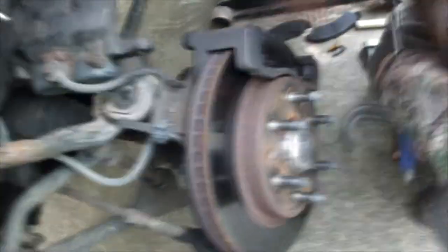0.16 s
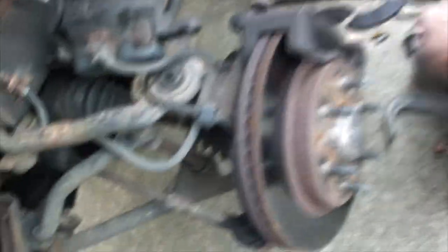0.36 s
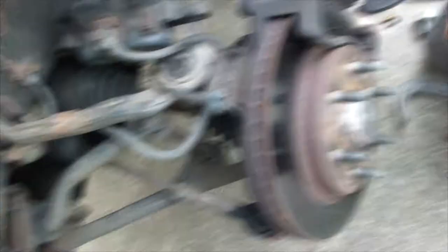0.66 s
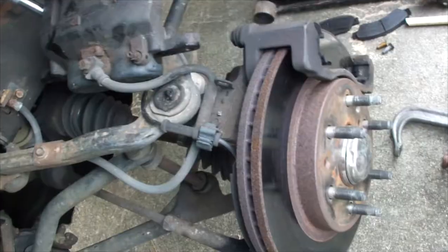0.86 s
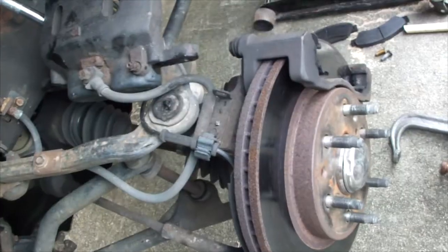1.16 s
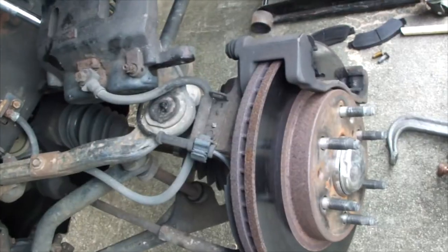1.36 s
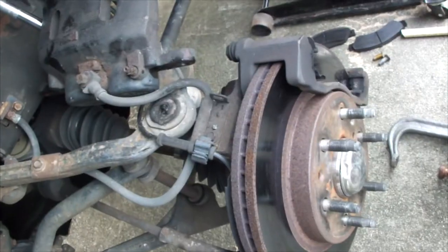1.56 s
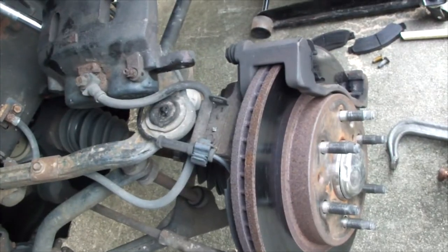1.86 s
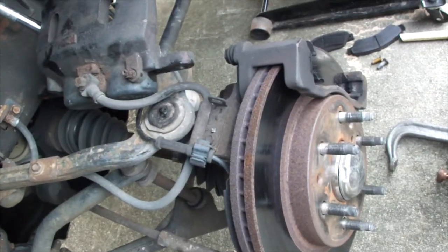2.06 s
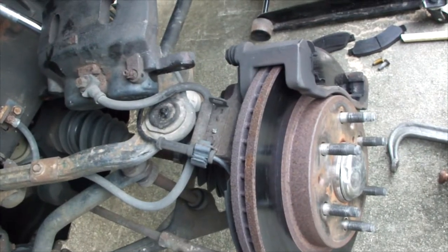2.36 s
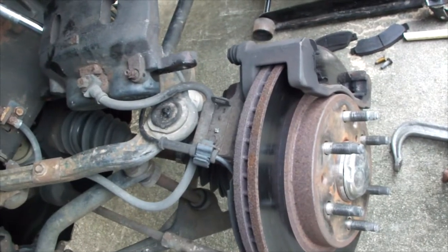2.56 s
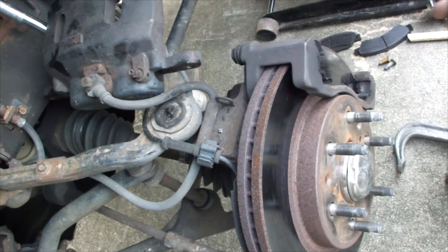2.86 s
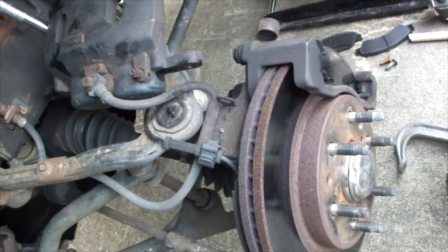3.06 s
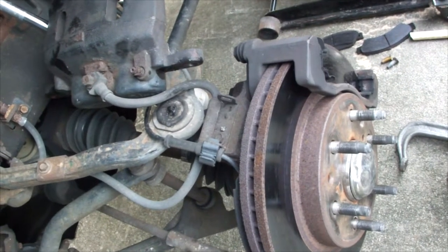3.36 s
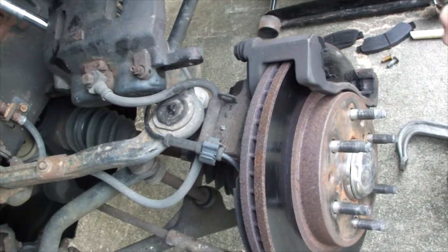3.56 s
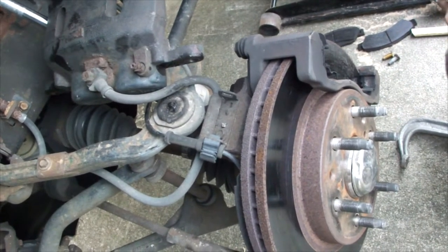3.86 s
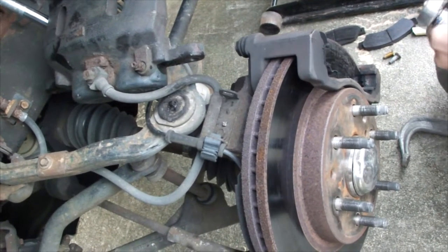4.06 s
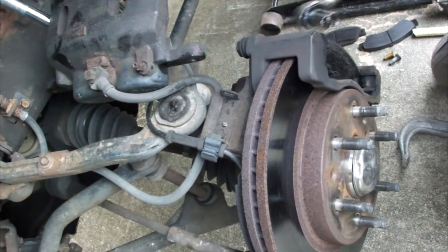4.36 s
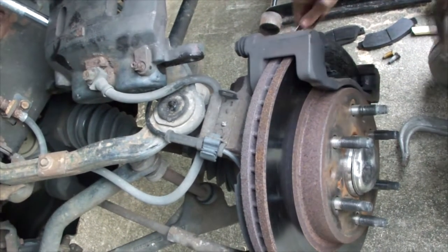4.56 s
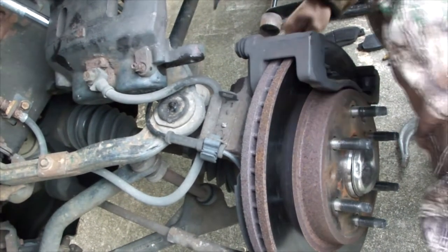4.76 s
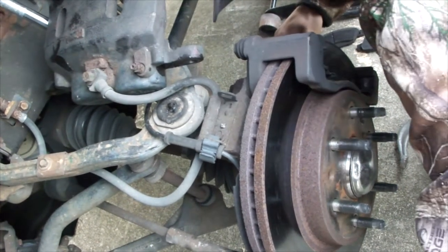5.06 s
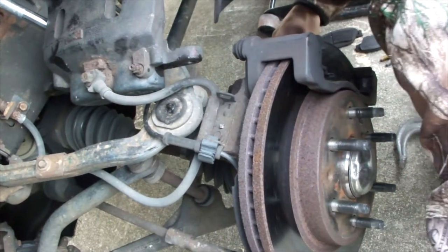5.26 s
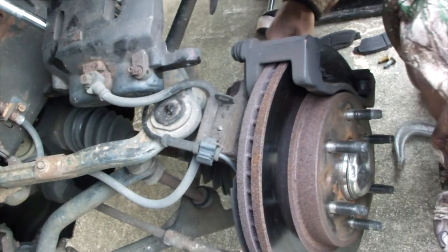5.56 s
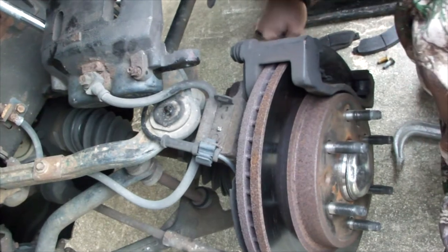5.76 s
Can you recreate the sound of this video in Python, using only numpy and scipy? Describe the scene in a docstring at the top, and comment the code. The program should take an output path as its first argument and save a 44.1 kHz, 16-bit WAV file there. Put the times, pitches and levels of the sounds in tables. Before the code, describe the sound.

Close metallic clinks and four quick ratchet rasps over low traffic wash, with faint bird calls and a hard steel knock near the end.

```python
"""Low traffic wash and airy hiss from beyond an open garage, then close by a tool is put down: the front brake of a
car is being worked on. Wrench and socket clink, and a ratchet swings back four times, its pawl rasping over the
teeth. Steel meets the caliper in a soft thump, then two knocks; a few far birds call. Steel contacts are short noise
bursts through resonances, knocks add decaying modes, birds are gliding sines, the background is coloured noise.
The garage adds a diffuse echo; the overall tone has a scooped presence and very little around 13 kHz."""
import sys
import numpy as np
from scipy import signal
from scipy.fft import rfft, irfft
from scipy.io import wavfile

SR = 44100
rng = np.random.default_rng(int(sys.argv[2]) if len(sys.argv) > 2 else 0)


def digitize_waveform(pressure):
    """Quantize a signal to 16-bit integers and store it at the path in sys.argv[1].

    Rows of a 2-D input are taken as channels; values are limited to [-1, 1].
    """
    field = np.atleast_2d(pressure).T
    bounded = np.clip(field, -1, 1)
    quanta = np.round(bounded * 32767).astype(np.int16)
    wavfile.write(sys.argv[1], SR, quanta)


N = 261072


def from_db(db):
    """Level in dB to amplitude factor."""
    return 10 ** (np.asarray(db) / 20)


def dying(t, t60):
    """Exponential decay that falls 60 dB in t60 seconds."""
    return from_db(-60 * t / t60)


def add(track, s, sound):
    """Mix a sound into a track at a given second."""
    at = max(int(s * SR), 0)
    part = sound[..., :N - at]
    track[..., at:at + part.shape[-1]] += part


def colour(x, points, size=16384):
    """Causal (minimum-phase) filter through (hz, db) points, built by folding the cepstrum."""
    hz, db = np.transpose(points)
    bin_hz = np.fft.rfftfreq(size, 1 / SR)
    gain_db = np.interp(np.log(bin_hz + 1), np.log(hz), db)
    cepstrum = irfft(np.log(from_db(gain_db)))[:size // 2]
    cepstrum[1:] *= 2
    response = irfft(np.exp(rfft(cepstrum, size)))[:size // 4]
    return signal.oaconvolve(x, np.array(response, ndmin=x.ndim), axes=-1)[..., :N]


def band(x, low_hz, high_hz):
    """Keep what lies between two frequencies."""
    edges_hz = [low_hz, min(high_hz, SR / 2 - 1)]
    return signal.sosfilt(signal.butter(2, edges_hz, "band", fs=SR, output="sos"), x + 1e-18)


def resonance(x, hz, width_hz):
    """Ringing of one mode: the narrower, the longer it rings."""
    return signal.lfilter(*signal.iirpeak(hz, hz / width_hz, fs=SR), x + 1e-18)


def widen(pair, width):
    """Mid and side to left and right, the side coloured by a width curve."""
    side = colour(pair[1], width)
    return np.array([pair[0] + side, pair[0] - side])


def outdoors():
    """Low wash of far traffic under an airy hiss; both swell together and step up early on. Sleeves add to the hiss."""
    # spectrum of the far traffic: hz, level_db
    traffic_colour = [(25, -28), (60, -21.5), (120, -3), (190, -1), (350, -1.5), (720, -1.5), (1200, -10),
                      (2500, -25), (8000, -53.5)]
    # spectrum of the hiss and the sleeves: hz, level_db
    air_colour = [(100, -13.5), (500, 0), (1200, 4), (2200, 1.5), (3300, -10.5), (6200, -11), (10000, -15),
                  (15000, -27.5)]
    # slow swell of the background: time_s, level_db
    swell_points = [(.8, 3), (1.05, .5), (1.5, 1.5), (2.4, -0.5), (3.4, 0), (4.25, 1.5), (4.7, -1),
                    (5.4, -0.5), (5.9, 2)]
    # sleeves rustling as the arms move: middle_s, spread_s (standard deviation of the bell shape), level_db
    rustles = [(2.38, 0.14, -55), (3.93, 0.15, -50.5), (4.236, .13, -46), (5.0, .12, -56),
               (5.76, 0.066, -59)]
    # side against mid for far sound: hz, level_db
    far_width = [(60, -18), (150, -10), (400, -4), (1300, -2), (6000, -3), (15000, 1.5)]
    traffic_db, air_db = -39, -53.5
    step_s, step_rise_s, before_step_db = .81, .015, -9.5

    t = np.arange(N) / SR
    before_step = np.clip((step_s - t) / step_rise_s + .5, 0, 1)
    swell = from_db(np.interp(t, *np.transpose(swell_points)) + before_step_db * before_step)
    rustle = 0
    for middle_s, spread_s, db in rustles:
        rustle = rustle + from_db(db) * np.exp(-.5 * ((t - middle_s) / spread_s) ** 2)
    traffic = from_db(traffic_db) * swell * colour(rng.standard_normal((2, N)), traffic_colour)
    air_level = np.hypot(from_db(air_db) * swell, rustle)
    air = air_level * colour(rng.standard_normal((2, N)), air_colour)
    return widen(traffic + air, far_width)


def chatter(hold_s, fall_t60, tail_db, tail_t60, grain_db=9.5):
    """Steel on steel, as mid and side: a few ms of uneven rebounds, then a weaker scatter off the parts nearby."""
    t = np.arange(SR // 8) / SR
    after = np.maximum(t - hold_s, 0)
    shape = np.hypot(dying(after, fall_t60), from_db(tail_db) * dying(after, tail_t60))
    attack = 1 - np.exp(-t / 0.00084)
    grains = from_db(grain_db * np.clip(rng.standard_normal(len(t)), -2, 2))
    grains /= np.sqrt(np.mean(grains ** 2))
    return rng.standard_normal((2, len(t))) * grains * shape * attack


def knocks(blows, modes, punch, rattle_db, ring_db):
    """Each blow is one push, a rattle around the pitch of the contact, a sharp tick and the struck body's modes."""
    # spectrum of all knocks: hz, level_db
    knock_colour = [(30, -30), (100, -15), (220, -1), (2500, 2), (7000, -1), (10500, -5.5), (14000, -30)]
    out, t = np.zeros((2, N)), np.arange(SR // 3) / SR
    quarter_turn = [[0], [np.pi / 2]]   # side against mid
    for s, db, contact_hz, t60, tick_db in blows:
        force = from_db(rattle_db) * rng.standard_normal((2, len(t))) * dying(t, t60)
        force[0, 0] += punch
        sound = band(force, contact_hz / 1.6, contact_hz * 1.3)
        for k, (hz, mode_db, mode_t60) in enumerate(modes):
            softness = 1 / (1 + (hz / contact_hz / 2) ** 2)   # a dull contact hardly wakes the high modes
            level = from_db(ring_db + mode_db + rng.normal(0, 2.2, (2, 1)))
            strength = (-1) ** k * softness * level
            sound = sound + strength * np.sin(2 * np.pi * hz * t + quarter_turn) * dying(t, mode_t60)
        tick = from_db(tick_db) * chatter(hold_s=0.0015, fall_t60=0.019, tail_db=-6.5, tail_t60=0.066)
        add(out, s, from_db(db) * sound)
        add(out, s, from_db(db) * tick)
    return colour(out, knock_colour)


def tool_put_down():
    """A tool lands in a quick run of contacts that ring its modes."""
    # contacts: start_s, level_db, contact_hz, rattle_t60_s, tick_db
    blows = [(0.082, -39, 900, 0.094, -12), (0.090, -26.5, 1850, 0.096, -16), (0.101, -21, 624, 0.067, -15),
             (0.106, -11.5, 1920, 0.039, -16.5)]
    # modes of the struck body: pitch_hz, level_db, t60_s
    modes = [(190, -30, .12), (300, -27, .1), (495, -24, .12), (630, -26, .1), (750, -26, .1),
             (890, -30, .15), (1390, -11, .08), (1560, -14, .07), (1830, -21, .12), (2385, -17, .045),
             (3200, -17, .03)]
    return knocks(blows, modes, punch=7.0, rattle_db=2.5, ring_db=-4.5)


def whistle(length_s, bend, trill_hz, waver=0.012, flutter_db=3.5):
    """One call: the pitch arcs through start, middle and end under a trill, fluttering in pitch and strength."""
    trill_rate_hz, fade_s = 23.06, .014
    t = np.arange(0, length_s, 1 / SR)
    knots = np.linspace(0, length_s, 24)
    wobble, flutter = (np.interp(t, knots, rng.standard_normal(len(knots))) for _ in range(2))
    arc_hz = np.polyval(np.polyfit([0, .5, 1], bend, 2), t / length_s)
    hz = arc_hz + trill_hz * np.sin(2 * np.pi * trill_rate_hz * t)
    phase = 2 * np.pi * np.cumsum(hz * (1 + waver * wobble)) / SR
    fade = np.clip(np.minimum(t, length_s - t) / fade_s, 0, 1)
    return fade * from_db(flutter_db * flutter) * np.sin(phase)


def birds():
    """Far birds: gliding whistles, some trilled, and a few level coos."""
    # whistles: start_s, length_s, start_hz, middle_hz, end_hz, trill_depth_hz, level_db
    calls = [(2.30, .13, 2500, 2800, 2450, 0, -64.5), (4.88, .185, 2400, 2580, 2400, 160.5, -54),
             (5.06, .115, 2650, 2280, 2050, 29, -58), (5.02, .075, 7200, 6700, 8000, 0, -62.5),
             (5.295, .105, 2780, 2240, 2650, 21, -58)]
    # coos: start_s, length_s, pitch_hz, level_db
    coos = [(.27, 0.073, 1072, -59), (0.348, 0.23, 354.5, -62), (0.718, .08, 328.5, -56.5)]
    out = np.zeros(N)
    for s, length_s, start_hz, middle_hz, end_hz, trill_hz, db in calls:
        add(out, s, from_db(db) * whistle(length_s, [start_hz, middle_hz, end_hz], trill_hz))
    for s, length_s, hz, db in coos:
        add(out, s, from_db(db) * whistle(length_s, [hz, hz, hz], 0))
    return out


def steel_body(contacts, direct_colour, modes):
    """Contacts are heard directly and through the ringing of the part."""
    ringing = sum(from_db(db) * resonance(contacts, hz, width_hz) for hz, width_hz, db in modes)
    return colour(contacts, direct_colour) + ringing


def clinks():
    """Loose play of the socket: each touch has its own ring and amount of treble; some graze first."""
    # light clinks of wrench and socket: start_s, level_db, treble_db, ring_hz, grazes (count before the touch)
    touches = [(1.082, -53, -2, 2000, 0), (1.185, -38, -32, 2170, 0), (1.598, -22.5, -5, 1480, 0),
               (1.727, -33.5, -28, 1470, 0), (1.762, -31.5, -18.5, 1750, 1), (1.779, -32, -11, 1900, 0),
               (2.259, -34, 2.5, 2240, 1), (2.559, -32.5, 2.5, 1880, 2), (2.719, -36.5, -1, 1820, 0),
               (2.791, -33.5, -18, 1920, 0), (3.070, -38, -15.5, 1630, 0), (3.086, -42, -17, 1510, 1),
               (3.098, -39.5, 12, 1900, 0), (3.572, -41, -3.5, 1840, 0), (3.585, -34, .5, 1770, 0),
               (3.776, -27, -10, 1325, 0), (4.045, -35.5, 1, 1860, 0), (4.123, -36, -1.5, 1850, 0),
               (4.297, -48.5, 4, 1810, 0), (5.640, -43, -9.5, 1570, 0), (5.772, -45.5, -14, 1980, 0),
               (5.840, -46, -4, 1820, 0)]
    # spectrum of the direct contact: hz, level_db
    socket_colour = [(100, -24.5), (800, -23), (1500, 2.5), (2400, -2), (6500, -4), (10000, -8.5),
                     (15000, -13.5)]
    # resonances of the socket: pitch_hz, width_hz, level_db
    socket_modes = [(2400, 230, 3.5), (3530, 59, 0.5), (6460, 67, 0), (6568, 41, -12.5), (9030, 160, -6.5)]
    graze_s, graze_loss_db = 0.0043, 5   # spacing as a part slides home; each earlier graze is softer by this
    treble_split = signal.butter(1, 2600, fs=SR, output="sos")

    contacts, rings = np.zeros((2, 2, N))
    for s, db, treble_db, hz, grazes in touches:
        for early in range(round(grazes) + 1):
            when = s - early * graze_s
            force = from_db(db - early * graze_loss_db)
            touch = force * chatter(hold_s=0.0043, fall_t60=0.035, tail_db=-6.5, tail_t60=0.075)
            dull = signal.sosfilt(treble_split, touch)
            add(contacts, when, dull + from_db(treble_db) * (touch - dull))
            add(rings, when, resonance(touch, hz, width_hz=126))
    return steel_body(contacts, socket_colour, socket_modes) + from_db(9.0) * rings


def tooth_gaps(count, start_drag, end_drag, braking_teeth):
    """Relative spacing of the teeth, near 1 at full speed: the hand speeds up, runs evenly, then brakes."""
    speed_up_teeth = 2
    k = np.arange(count - 1)
    speeding_up = start_drag * np.exp(-k / speed_up_teeth)
    braking = end_drag * np.exp(-k[::-1] / braking_teeth)
    return 1 + speeding_up + braking


def pawl():
    """The pawl snaps once per tooth, with uneven force; the handle's speed sets spacing and strength."""
    # pushes of the handle (the first swing takes two): start_s, end_s, teeth (count),
    # start_drag and end_drag (extra spacing of first and last teeth, ratio), braking_teeth (count),
    # first_snap_db, level_at_speed_db, slow_loss_db
    pushes = [(1.880, 1.949, 8, 0.31, .45, 0.58, -17, -17.5, -1),
              (1.963, 2.167, 18, .2, 0.81, 4.04, -19, -17.5, -1),
              (2.566, 2.693, 13, 0.53, 3.6, 1.51, -14.5, -12, 9),
              (3.126, 3.265, 11, .25, 1.9, .5, -15.5, -17, 6),
              (3.607, 3.731, 13, 0.27, 0.82, 0.96, -15, -14.5, 6)]
    # one broad ring of the handle, favoured by the grip of each push: pitch_hz, width_hz, level_db
    grips = [(1985, 220, 5), (2010, 195, 6), (1950, 117, -4), (1693, 310, -7), (1650, 530, -16)]
    # spectrum of the direct click: hz, level_db
    click_colour = [(30, -15), (400, -35), (900, -25.5), (1400, -6.5), (1900, 1), (3000, -4.5),
                    (6000, -3.5), (10000, -0.5), (15000, 2.5)]
    # resonances of the wrench: pitch_hz, width_hz, level_db
    wrench_modes = [(1130, 50, -2), (1785, 45, 9), (1955, 40, 6), (2150, 45, 4), (2245, 45, 3),
                    (3420, 40, 2), (4430, 250, -3), (6215, 60, 2), (6325, 45, 3), (6670, 80, 4),
                    (6960, 50, 0), (8855, 110, 6), (9277, 30, 2), (9656, 40, 2), (10320, 70, 2)]

    contacts, rings = np.zeros((2, 2, N))
    for push, (grip_hz, width_hz, grip_db) in zip(pushes, grips):
        start, end, teeth, start_drag, end_drag, braking_teeth, first_db, db, slow_loss_db = push
        gaps = tooth_gaps(round(teeth), start_drag, end_drag, braking_teeth)
        times = start + (end - start) * np.append(0, np.cumsum(gaps)) / gaps.sum()
        speed = 1 / np.append(gaps, gaps[-1])
        levels = db - slow_loss_db * (1 - speed ** 2)
        levels[0] = first_db
        for when, level_db in zip(times, levels):
            force = from_db(level_db + rng.uniform(-1.3, 1))   # dB, from tooth to tooth
            snap = force * chatter(hold_s=.003, fall_t60=.015, tail_db=-12, tail_t60=.075, grain_db=3.5)
            add(contacts, when, snap)
            ring_hz = grip_hz * (1 + rng.normal(0, 0.11))
            add(rings, when, from_db(grip_db) * resonance(snap, ring_hz, width_hz))
    return from_db(0.05) * (steel_body(contacts, click_colour, wrench_modes) + rings)


def pings():
    """A bending mode of the handle swells quickly and dies."""
    # brief pings: start_s, pitch_hz, level_db, t60_s
    handle_rings = [(3.591, 3400, -33, 0.17), (3.630, 3435, -12.5, .06)]
    out, t = np.zeros(N), np.arange(SR // 4) / SR
    attack = 1 - np.exp(-t / 0.0053)
    for s, hz, db, t60 in handle_rings:
        add(out, s, from_db(db) * np.sin(2 * np.pi * hz * t) * dying(t, t60) * attack)
    return out


def caliper_knocks():
    """Steel meets the caliper in three clusters of contacts that ring its modes: a soft thump, then two knocks."""
    # contacts: start_s, level_db, contact_hz, rattle_t60_s, tick_db
    blows = [(3.765, -27, 490, 0.05, -37), (3.772, -30, 200, 0.11, -29), (5.481, -28, 1845, 0.078, -37),
             (5.496, -27.5, 1076, 0.055, -39), (5.508, -24.5, 613, 0.13, 0.5), (5.678, -29, 1410, .06, -30),
             (5.686, -36, 1300, 0.052, -21), (5.688, -11, 1500, 0.065, -6), (5.697, -17, 910, 0.17, -33),
             (5.712, -35, 1410, 0.14, -21), (5.77, -31.5, 232, 0.34, -22)]
    # modes of the caliper: pitch_hz, level_db, t60_s
    modes = [(572, -17, 0.15), (680, -42, 0.083), (789, -15.5, 0.11), (956, -17.5, 0.15),
             (1118, -18.5, 0.22), (1347, -27, 0.21), (1497, -28, 0.12), (1660, -38, .06), (2076, -18, 0.14),
             (3373, -21, 0.13)]
    return knocks(blows, modes, punch=5.5, rattle_db=7.0, ring_db=0.0)


def garage(x):
    """A diffuse echo of decaying noise bands, different at each ear, that lasts longest in the bass."""
    # bands of the echo: centre_hz, t60_s, level_db
    echo_bands = [(249.6, 0.63, -16), (853, 0.14, -20), (2200, 0.36, -20.5), (7580, 0.32, -30.5)]
    t = np.arange(SR // 2) / SR
    echo = 0
    for hz, t60, db in echo_bands:
        shape = dying(t, t60) * (1 - np.exp(-t / .008))
        shape /= np.linalg.norm(shape)
        echo = echo + from_db(db) * band(rng.standard_normal((2, len(t))), hz / 2, hz * 2) * shape
    return signal.fftconvolve(x[None], echo, axes=1)[:, :N]


def scene():
    """Ratchet and knocks close by, birds and traffic outside, and the garage's echo."""
    # side against mid for close sound: hz, level_db
    close_width = [(60, 2.5), (400, -7), (700, -16), (1300, -10), (2400, -12), (4400, -9.5), (8100, -3.5),
                   (15000, 2.5)]
    # ratchet slightly to the right, knocks slightly to the left: dB per ear
    ratchet_balance = from_db(np.array([[-.3], [.3]]))
    knock_balance = from_db(np.array([[.9], [-.9]]))

    ratchet = widen(pawl() + clinks(), close_width) * ratchet_balance + pings()
    struck = widen(tool_put_down() + caliper_knocks(), close_width) * knock_balance
    work = ratchet + struck
    song = birds()
    echo = garage(work.mean(axis=0) + from_db(15.5) * song)   # the far birds carry much echo
    return work + from_db(-1) * song + echo + outdoors()


def record(dry):
    """Overall tone: scooped presence, very little around 13 kHz, three deep, narrow dips; the top is cut."""
    # overall tone: hz, level_db; scooped presence, very little around 13 kHz
    overall_tone = [(2300, 0.5), (2650, -3.5), (2900, -11), (3400, -6), (4000, -11), (4500, -8.5),
                    (5100, -5.5), (5700, 3), (6500, 4.5), (10400, 2), (11400, -12.5), (12400, -38.5),
                    (13400, -42.5), (14500, -9.5)]
    # narrow dips of the microphone: centre_hz, width_hz
    dips = [(3010, 200), (3990, 220), (5020, 200)]
    cutoff_hz = 15900
    x = colour(dry, overall_tone)
    for hz, width_hz in dips:
        edges_hz = [hz - width_hz / 2, hz + width_hz / 2]
        x = signal.sosfilt(signal.butter(2, edges_hz, "bandstop", fs=SR, output="sos"), x)
    return signal.sosfilt(signal.ellip(10, .5, 80, cutoff_hz, fs=SR, output="sos"), x)


dry = scene()
out = record(dry)
digitize_waveform(out)
```